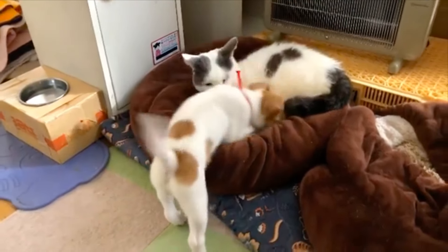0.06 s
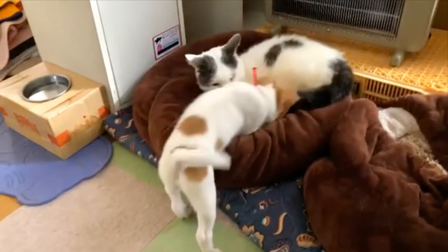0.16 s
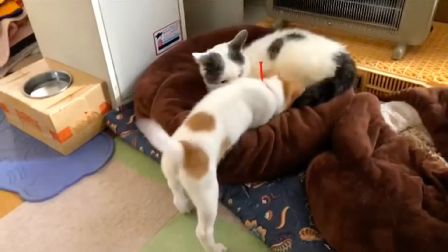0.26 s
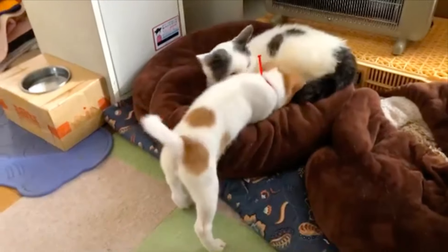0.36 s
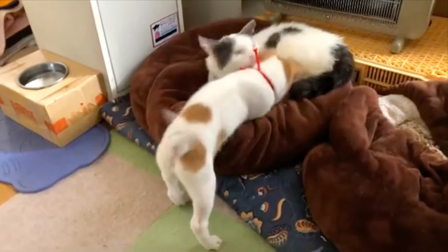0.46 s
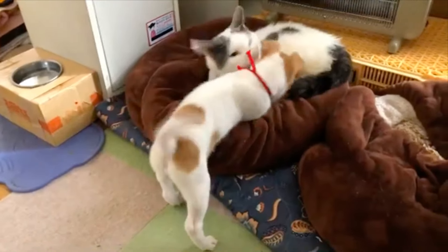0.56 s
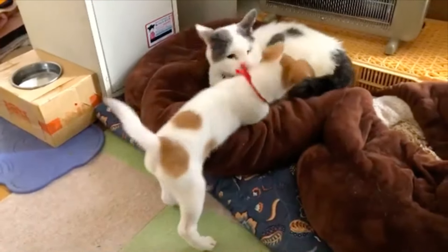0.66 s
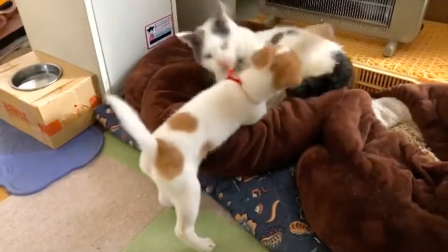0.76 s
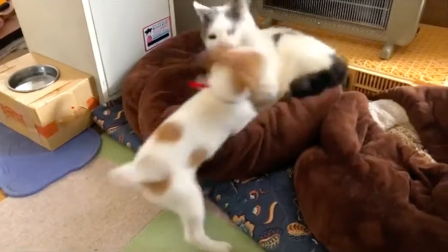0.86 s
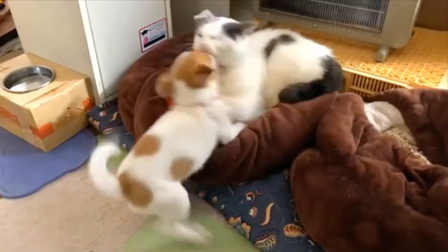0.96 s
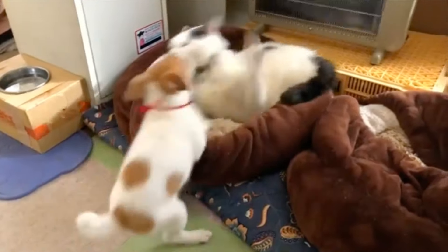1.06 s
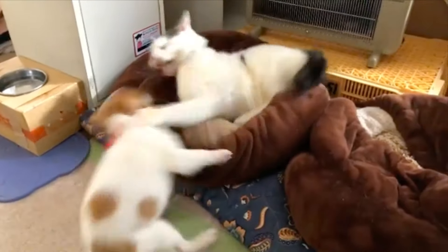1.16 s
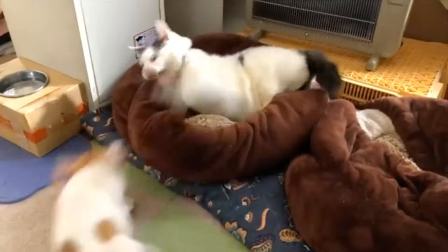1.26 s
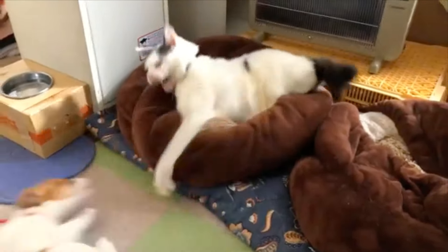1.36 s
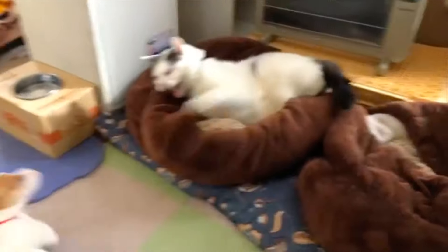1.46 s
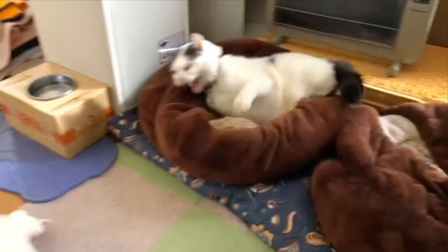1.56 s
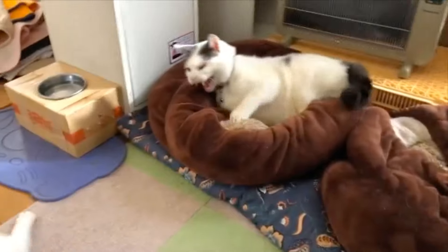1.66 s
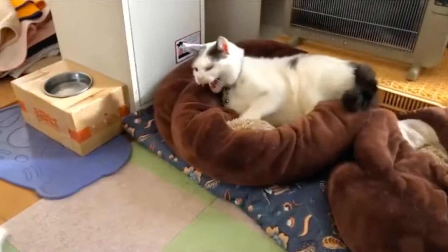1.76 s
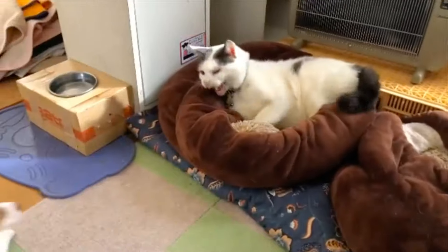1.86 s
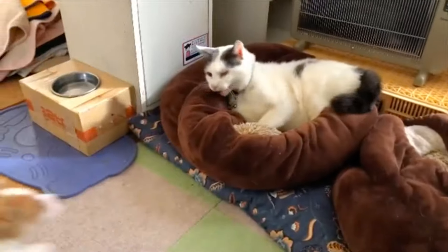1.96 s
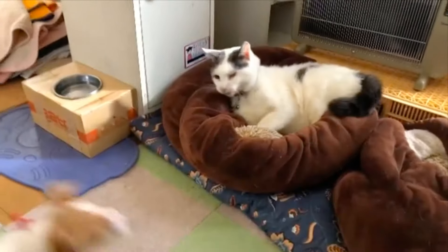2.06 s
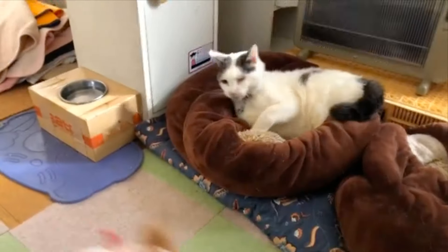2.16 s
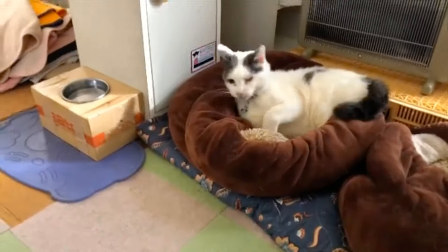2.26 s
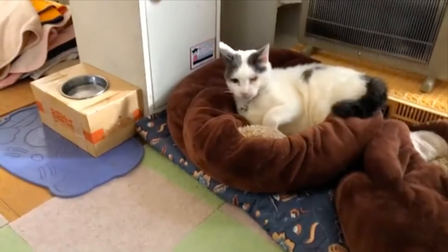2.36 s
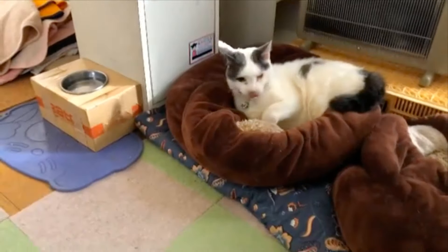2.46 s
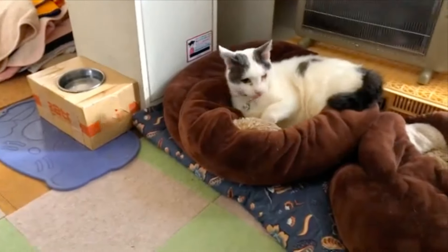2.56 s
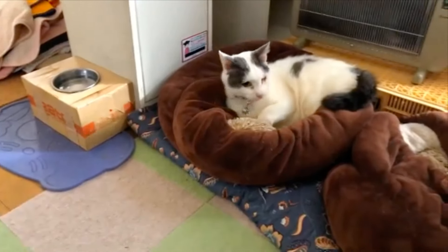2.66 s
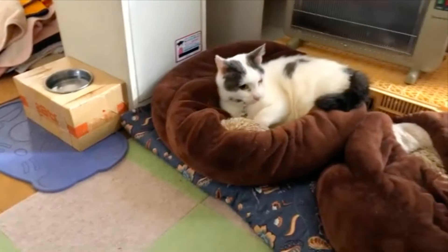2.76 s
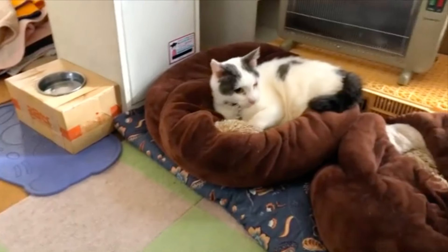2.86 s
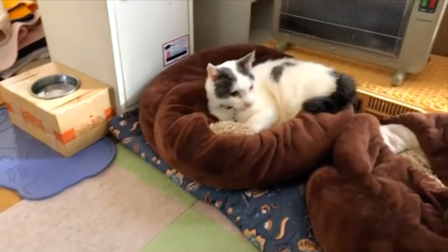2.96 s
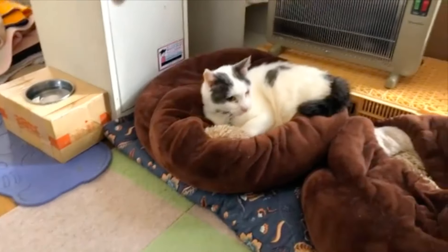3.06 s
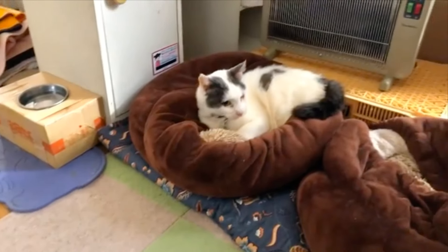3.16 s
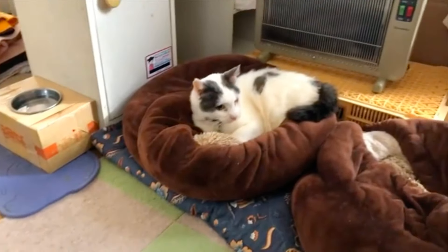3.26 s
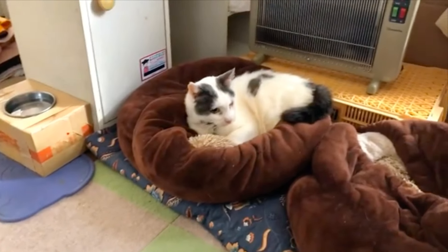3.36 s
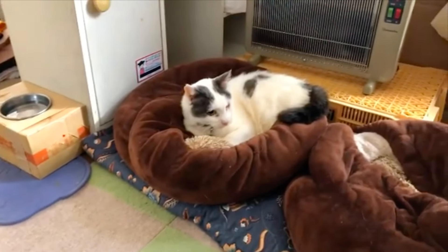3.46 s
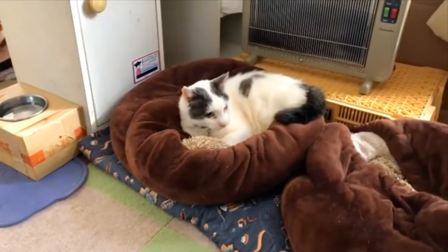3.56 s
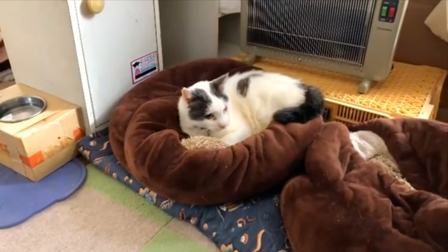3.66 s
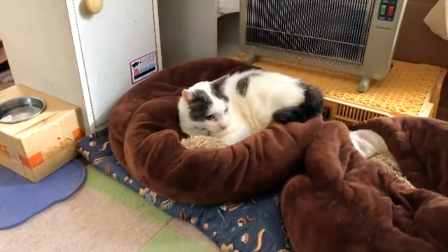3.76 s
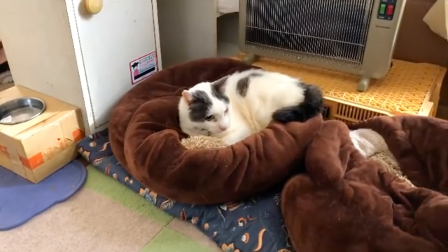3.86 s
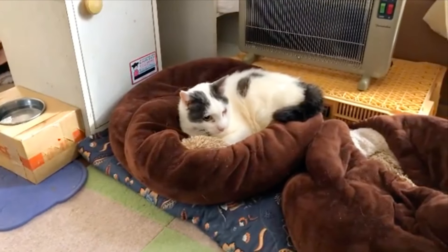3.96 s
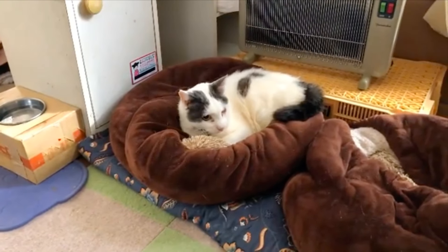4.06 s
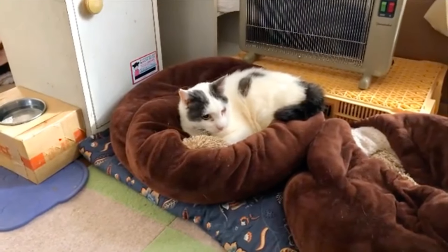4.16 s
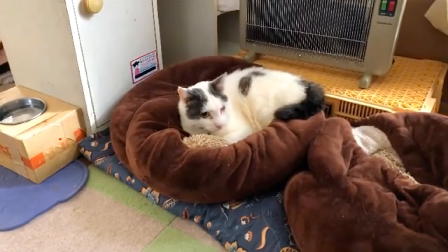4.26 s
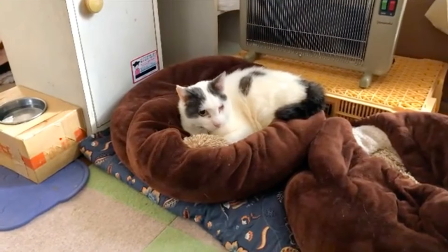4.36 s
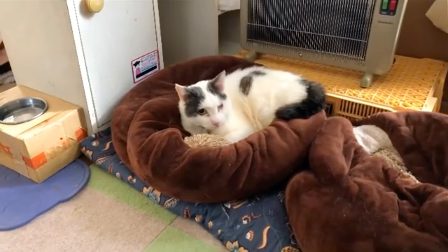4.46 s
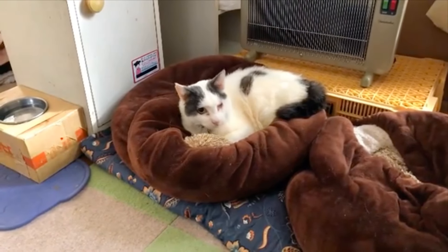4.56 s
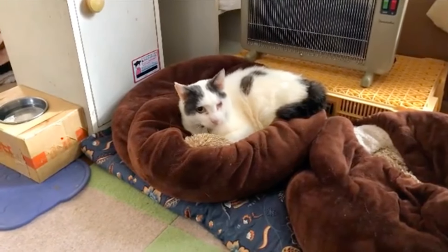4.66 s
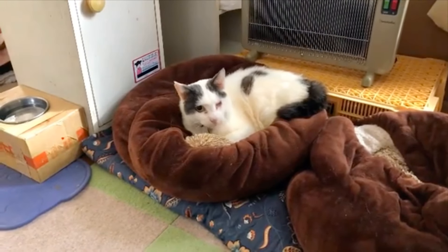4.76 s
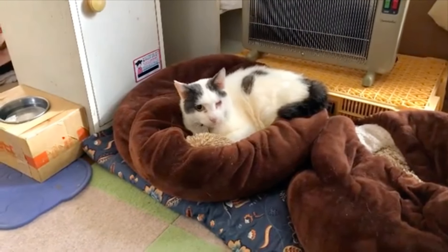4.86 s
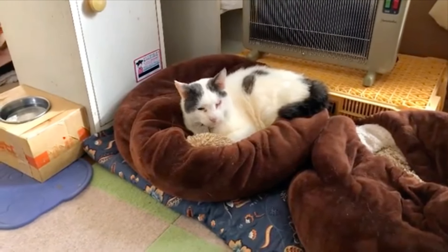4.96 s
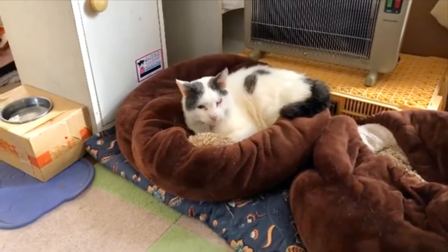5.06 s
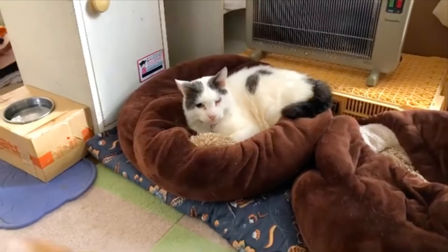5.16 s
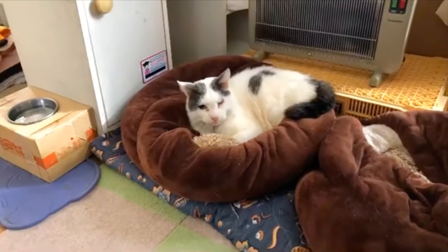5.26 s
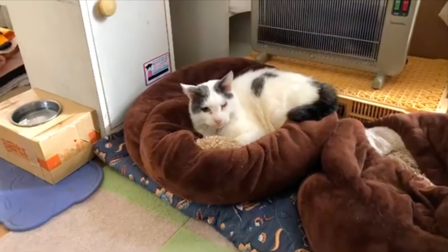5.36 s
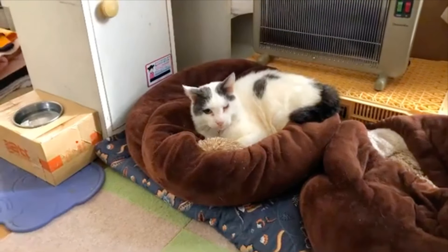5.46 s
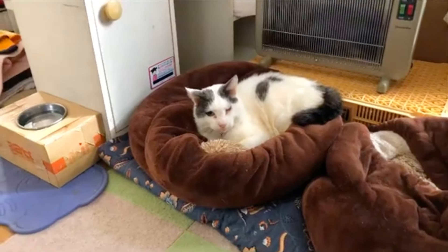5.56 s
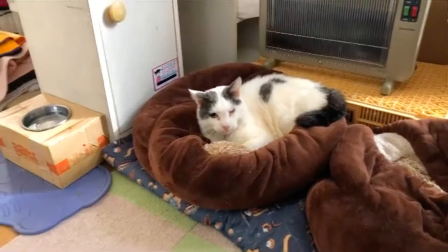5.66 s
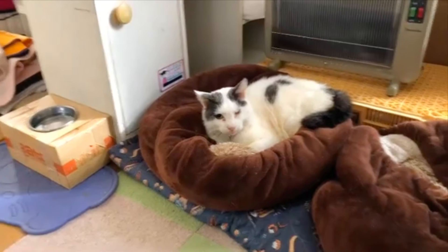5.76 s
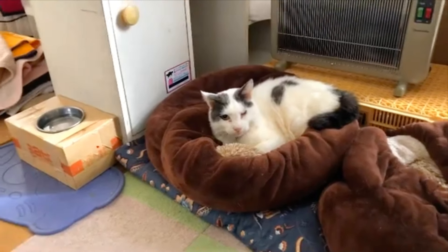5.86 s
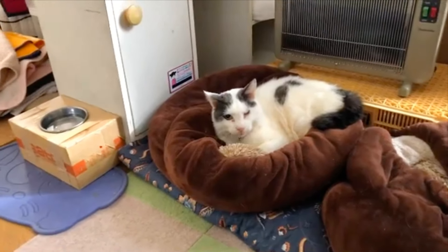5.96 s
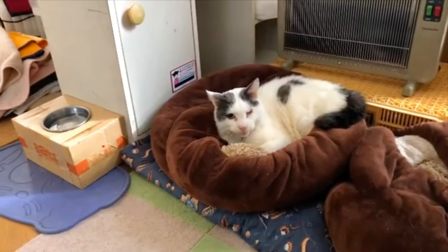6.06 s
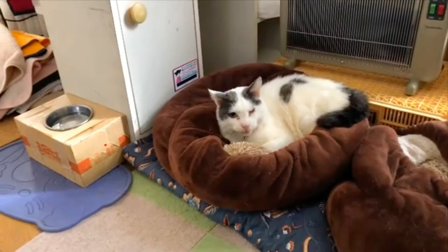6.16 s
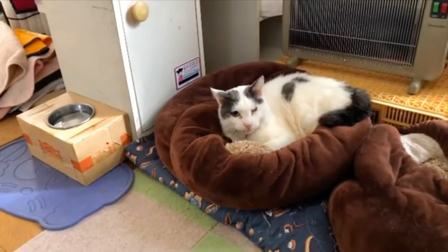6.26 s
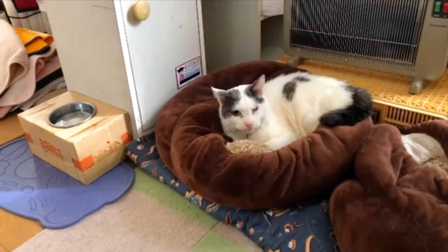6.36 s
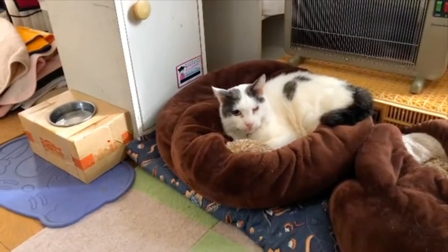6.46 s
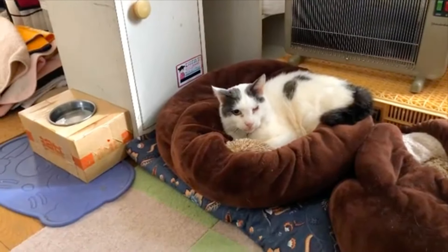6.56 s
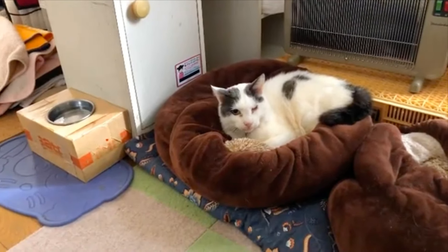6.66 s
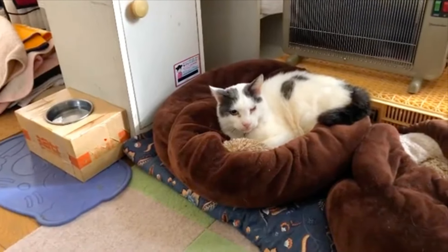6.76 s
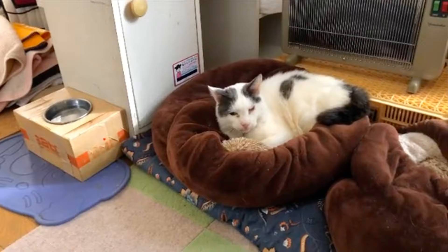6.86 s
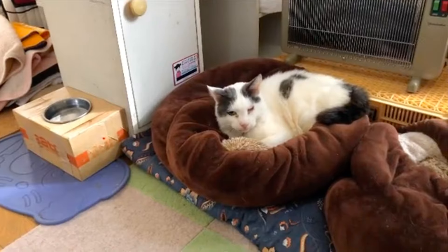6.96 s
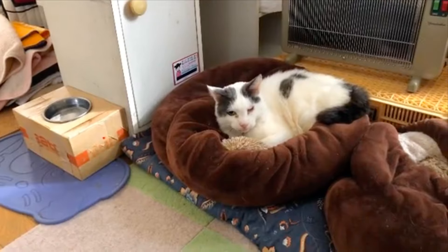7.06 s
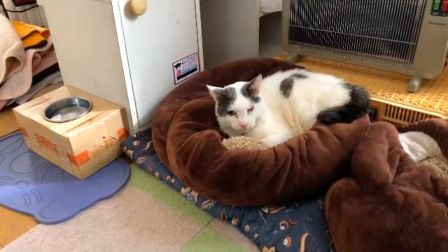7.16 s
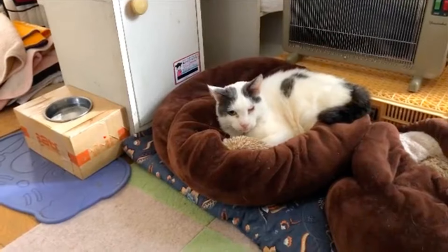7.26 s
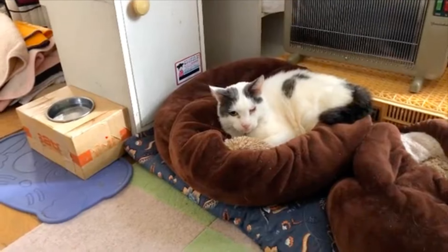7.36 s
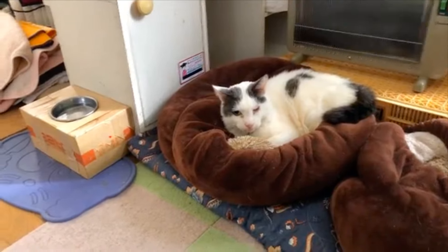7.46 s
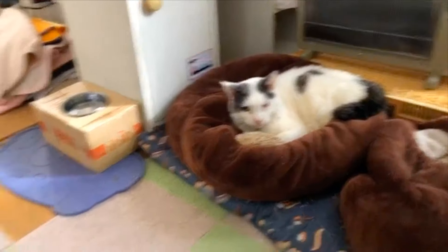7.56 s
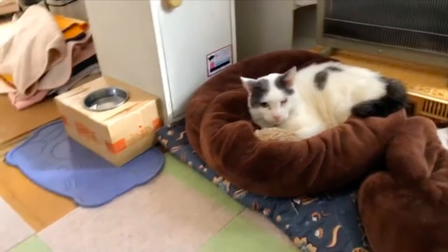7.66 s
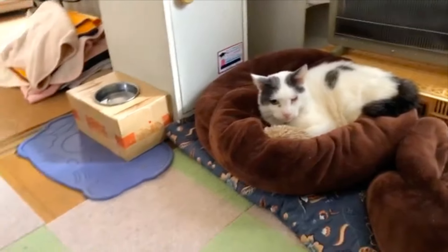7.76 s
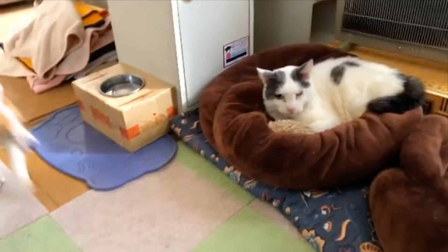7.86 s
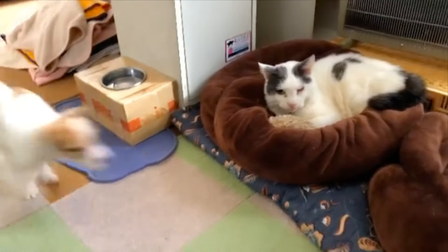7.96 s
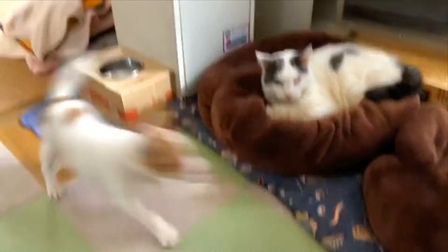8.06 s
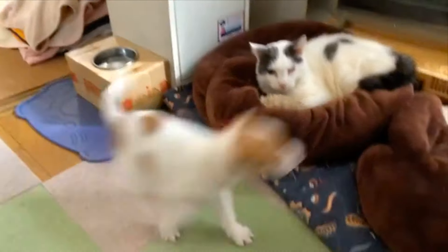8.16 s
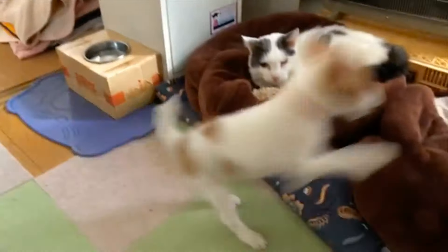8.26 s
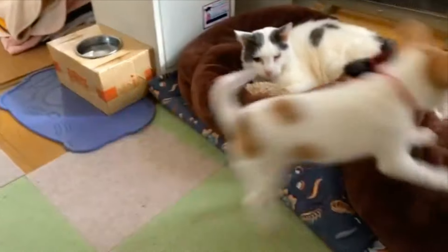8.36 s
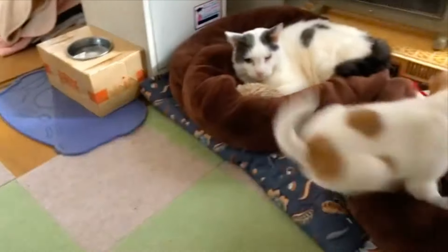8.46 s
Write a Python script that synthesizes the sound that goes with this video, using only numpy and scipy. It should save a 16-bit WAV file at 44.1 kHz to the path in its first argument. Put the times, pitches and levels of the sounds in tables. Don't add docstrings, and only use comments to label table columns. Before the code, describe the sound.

Brief rough cat cry, bell-jangling swat and a sharp fading hiss, followed by a puppy galloping away and back over boomy floorboards with clicking claws.

```python
import sys
import numpy as np
from scipy import signal
from scipy.io import wavfile
from scipy.ndimage import uniform_filter1d

SR = 44100
rng = np.random.default_rng(int(sys.argv[2]) if len(sys.argv) > 2 else 0)


def generate_wav(sig):
    pcm = np.round(np.clip(np.atleast_2d(sig).T, -1, 1) * 32767).astype(np.int16)
    wavfile.write(sys.argv[1], SR, pcm)


def boost(x):
    u = np.asarray(x, float) / 20
    return 10 ** u


N = 375732


def evened(x):
    return x / np.sqrt(np.mean(x ** 2) + 1e-20)


def read(points, hz):
    f, value = np.transpose(points)
    return np.interp(np.log(hz + 1), np.log(f + 1), value)


def add(mix, s, sound):
    part = mix[round(s * SR):][:len(sound)]
    part += sound[:len(part)]


def resonate(x, hz, width):
    turn = np.exp(2j * np.pi * np.cumsum(hz * np.ones(len(x))) / SR)
    r = np.exp(-np.pi * width / SR)
    return 2 * (turn * signal.lfilter([1 - r], [1, -r], x / turn + 1e-18)).real


def band(x, lo_hz, hi_hz):
    edges_hz = [lo_hz, min(hi_hz, .45 * SR)]
    return evened(signal.sosfilt(signal.butter(2, edges_hz, "band", fs=SR, output="sos"), x))


def columns(rows):
    s, *values = np.transpose(rows)
    t = np.arange(s[0], s[-1], 1 / SR)
    return t, [np.interp(t, s, v) for v in values]


def ring(hz, db, t60, t, phase=0):
    return boost(db - 60 * t / t60) * np.sin(2 * np.pi * hz * t + phase)


def noise(colour_db, patchy_db):
    frames, hz = N // 256 + 5, np.fft.rfftfreq(1024, 1 / SR)
    a, b, patches = rng.standard_normal((frames, 513, 3)).T
    patches = uniform_filter1d(patches, size=12, axis=0)
    patches = evened(uniform_filter1d(patches, size=10, axis=1))
    z = (a + 1j * b) * boost(colour_db(hz)[:, None] + patchy_db * patches)
    return evened(signal.istft(z, nperseg=1024, noverlap=768)[1][:N])


# (time [s], effort [dB], pitch [Hz], mouth resonance [Hz], roughness [0-1])
YOWL_CURVE = [
    (.475, -46, 591, 2360, 0.54),
    (.55, -40, 591, 2800, 0.6),
    (.562, -32.5, 628, 2180, 0.16),
    (.605, -32, 648, 2610, 0.47),
    (.634, -35, 681, 2460, 0.7),
    (.645, -29.5, 718, 2200, .45),
    (.668, -34.5, 700, 1800, 0.4),
    (.728, -33, 600, 1650, 0.5),
    (.755, -43, 500, 1533, 1),
]


def yowl():
    t, (effort_db, hz, mouth_hz, rough) = columns(YOWL_CURVE)
    rough = np.clip(rough, 0, 1)
    jitter = 1 + .26 * uniform_filter1d(rng.standard_normal(len(t)), size=120)
    turns = np.cumsum(hz * jitter) / SR
    folds = sum(np.cos(2 * np.pi * k * turns) for k in range(1, 12))
    puffs = (0.48 + np.exp(-(turns % 1) / 0.52)) * rng.standard_normal(len(t))
    drive = (1 - rough) * evened(folds) + rough * evened(puffs)
    flutter = boost(2.2 * evened(uniform_filter1d(rng.standard_normal(len(t)), size=400)))
    throat = boost(-5) * resonate(resonate(drive, hz, 270), hz, 270)
    mouth = drive
    for _ in range(3):
        mouth = resonate(mouth, mouth_hz, 1500)
    breath = resonate(resonate(drive + .8 * puffs, 5700, 900), 5700, 900)
    voice = throat - mouth + boost(-23) * flutter * breath
    return t[0], boost(effort_db - 0.5) * flutter * evened(voice) * signal.windows.tukey(len(t), .1)


# (frequency [Hz], level per Hz [dB])
HISS_SPECTRUM = [(120, -28), (230, -2.5), (500, -9), (922, -8.5), (1520, -11), (1950, -13.5), (3630, -14),
                 (14000, -20.5)]
# (frequency [Hz], width [Hz], gain [dB])
MOUTH_RESONANCES = [(960, 360, 5.5), (1320, 350, 5), (2800, 590, 3), (3620, 180, 2), (4500, 1400, 7),
                    (11400, 6200, 10.5)]
# (frequency [Hz], width [Hz], level [dB])
JAW_RESONANCES = [(1000, 100, -12), (1500, 100, -15.5), (2835, 130, -15), (3650, 200, -15),
                  (5190, 300, -15)]


def hiss():
    start_s, attack_s, hold_s, release_s = 1.3, 0.063, 0.57, 0.12
    level_db, edge_db, sag_db_per_s = -21.5, -15.5, 6.5
    spit_db, spit_s = 3.5, 0.039
    teeth_db, teeth_sag_db_per_s = -0.5, 14
    jaws_shut, jaws_open_s, jaws_wander = 0.89, 0.025, 0.044
    t = np.arange(0, attack_s + hold_s + release_s, 1 / SR)
    edges = np.maximum(1 - t / attack_s, 0) + np.maximum(1 - (t[-1] - t) / release_s, 0)
    spit = spit_db * np.exp(-(t / spit_s / 2) ** 4)
    flow_db = level_db - sag_db_per_s * t + edge_db * edges + spit

    def mouth(hz):
        return sum(db / (1 + (2 * (hz - f) / w) ** 2) for f, w, db in MOUTH_RESONANCES)

    ripples_db = 1.6 * evened(uniform_filter1d(rng.standard_normal(513), size=3))
    air = noise(lambda hz: read(HISS_SPECTRUM, hz) + mouth(hz) + ripples_db, 2.2)[:len(t)]
    z = rng.standard_normal((2, len(t)))
    jaws = 1 - (1 - jaws_shut) * np.exp(-t / jaws_open_s) + jaws_wander * band(z[0], 2.9, 14)
    air = air + sum(boost(db) * evened(resonate(z[1], f * jaws, w)) for f, w, db in JAW_RESONANCES)
    fizz = signal.sosfilt(signal.butter(1, 3000, "high", fs=SR, output="sos"), air)
    rasp = boost(1.5 * band(rng.standard_normal(len(t)), 18, 250))
    fizz_db = teeth_db - teeth_sag_db_per_s * t + 4 - 12 * np.exp(-t / 0.027)
    air += (boost(fizz_db) - 1) * fizz
    return start_s, boost(flow_db) * rasp * air * signal.windows.tukey(len(t), .05)


# (time [s], peak level [dB])
BELL_STROKES = [(0.9269, -21), (.934, -24), (0.941, -28), (.955, -41), (0.9888, -31), (1.03, -42.5),
                (1.137, -38), (1.158, -26), (1.206, -29), (1.26, -30), (1.292, -35), (1.06, -19.5),
                (1.0846, -23.5), (1.112, -28), (1.122, -24), (1.1516, -28), (1.184, -24), (1.2005, -14),
                (1.216, -24), (1.233, -28), (1.349, -28), (1.4, -26), (1.505, -24), (1.533, -25),
                (1.6679, -27), (2.8294, -44)]
# (frequency [Hz], level [dB], t60 [s])
BELL_MODES = [(9660, -15, 0.07), (9600, 5, 0.024), (10500, -18, 0.022)]


def bell():
    out, t = np.zeros(N), np.arange(5000) / SR
    chatter = boost(1900 * np.minimum(t, .005))
    phases = rng.uniform(0, 2 * np.pi, (len(BELL_STROKES), len(BELL_MODES)))
    for (s, db), phase in zip(BELL_STROKES, phases):
        shell = sum(ring(*mode, t, p) for mode, p in zip(BELL_MODES, phase))
        add(out, s, boost(db + 0.5) * shell * chatter * np.minimum(t / 0.0019, 1))
    return out


# (time [s], long-joist boom [dB], short-span boom [dB], plank knock [dB])
FLEEING_FALLS = [(1.001, -22.5, -48.5, -35.5), (1.08, -50, -39, -30.5), (1.175, -23, -30.5, -38),
                 (1.257, -42, -41, -29), (1.338, -10.5, -17, -51), (1.365, -3, -37, -28),
                 (1.433, 0, -7.5, -41), (1.462, -6.5, -15, -45), (1.498, -6, -40, -47),
                 (1.654, -12, -28, -30), (1.824, -11, -17.5, -33), (1.948, -22.5, -44, -50),
                 (2.128, -15, -21, -35), (2.218, -17.5, -25.5, -41), (2.29, -8, -22, -28),
                 (2.36, -20, -21, -46)]
# (time [s], joist [dB], span [dB], knock [dB])
AWAY_FALLS = [(2.538, -25, -23.5, -43), (2.68, -39, -31, -29.5), (2.839, -28, -22, -30.5),
              (2.971, -38, -24.5, -30.5), (3.112, -43, -19, -30.5), (3.186, -23, -20, -29),
              (3.253, -28, -19.5, -27.5), (3.394, -33, -27, -30.5), (3.541, -24, -19.5, -31.5),
              (3.616, -19, -21, -30), (3.77, -37, -27, -28), (3.971, -25, -49, -40),
              (4.022, -33, -20.5, -30), (4.445, -43, -31, -32), (4.504, -40, -31, -32),
              (4.69, -38, -31, -40), (4.742, -32, -25, -37), (5.13, -42, -40, -32), (5.75, -45, -36, -33)]
# (time [s], joist [dB], span [dB], knock [dB])
ROMPING_FALLS = [ (4.14, -35, -11, -24.5), (4.173, -14, -11.5, -14), (4.253, -14, -12.5, -20.5),
                 (4.388, -43, -21.5, -25), (4.56, -34, -16.5, -25), (4.61, -40, -17, -35),
                 (4.789, -17, -13, -58), (4.815, -16, -10, -20), (4.865, -33, -13, -23.5),
                 (4.963, -12, -6, -15), (5.205, -35, -5, -13.5), (5.227, 0.5, -3.5, -8),
                 (5.277, 4, -11.5, -16.5), (5.434, 1, -13, -24), (5.5505, 4.5, -9, -14.5)]
# (time [s], joist [dB], span [dB], knock [dB])
RETURNING_FALLS = [ (5.839, -21, -18, -28), (5.874, -8.5, -34, -26), (5.986, -13.5, -45, -31.5),
                   (6.1, -18, -31, -47), (6.152, -11, -18.5, -30.5), (6.172, -26, -39, -43),
                   (6.25, -30, -19, -24), (6.344, -19.5, -28, -24), (6.535, -51, -27.5, -56),
                   (7.427, -19, -21, -31), (7.53, -44, -24.5, -33), (7.572, -22, -21, -33),
                   (7.644, -10.5, -21, -32), (7.686, -10, -40, -41), (7.791, -10.5, -24, -37),
                   (7.826, -11, -35, -46), (7.969, -37.5, -18, -27.5), (8.012, -13, -18, -33.5),
                   (8.091, -13, -14, -30.5), (8.144, -34, -12.5, -39), (8.192, -8.5, -11, -19),
                   (8.243, -6.5, -37, -21), (8.328, -17, -20.5, -26.5), (8.371, -10.5, -17.5, -21.5)]
# (frequency [Hz], level [dB], t60 [s])
PLANK_MODES = [(216.8, -4.5, 0.16), (242.3, 6.5, 0.058), (307.6, -4, 0.11), (376.2, -3.5, 0.086),
               (460, -10.5, 0.09), (549, -10, 0.057), (706, -5, 0.026)]


def paws():
    boom, knocks, t = np.zeros(N), np.zeros(N), np.arange(SR // 3) / SR
    falls = FLEEING_FALLS + AWAY_FALLS + ROMPING_FALLS + RETURNING_FALLS
    chances = rng.random((len(falls), 2 + 2 * len(PLANK_MODES)))
    for (s, joist_db, span_db, knock_db), u in zip(falls, chances):
        joist = ring(103 + 2 * u[0], joist_db, .3, t)
        span = ring(129 + 9 * u[1], span_db + 9, 0.13, t)
        span = span + ring(178.5, span_db - 6.5, 0.35, t)
        spot = u[2:].reshape(-1, 2)
        knock = sum(ring(f * (.9 + 0.223 * a), d + 3 + 5 * b, t60, t)
                    for (f, d, t60), (a, b) in zip(PLANK_MODES, spot))
        add(boom, s, (joist + span) * (1 - np.exp(-t / 0.0075)))
        add(knocks, s, boost(knock_db) * knock * (1 - np.exp(-t / 0.0039)))
    return boom, knocks


# (time [s], level [dB], frequency [Hz], t60 [s])
PLANK_KNOCKS = [(1.58, -25.5, 228, 0.31), (3.775, -15.5, 256, .1), (4.033, -25, 323, 0.11),
                (4.277, -26, 176, 0.14), (4.316, -21, 191, 0.072), (4.398, -17, 240, 0.054),
                (4.57, -8.5, 234, 0.12), (4.974, -11, 290, 0.14), (5.545, -8.5, 389, 0.09),
                (5.846, -16.5, 190, .12), (6.209, -25.5, 642, 0.094), (7.968, -15, 488, 0.041),
                (4.826, -11, 257, 0.11), (4.875, -18, 248, 0.097), (4.962, -16, 306, .07),
                (5.205, -13, 320, 0.087), (5.223, -7, 600, .06), (5.448, -24, 750, .04),
                (5.552, -2, 118, .13), (5.5555, -17, 560, .04), (5.565, -17, 300, .2),
                (5.508, -27, 800, .05), (5.275, -13, 280, .15), (4.64, -24, 280, .15),
                (6.155, -23, 200, .08), (7.43, -24, 200, .12), (4.178, -22, 597, 0.053),
                (8.244, -22, 483, .06)]


def knocks_square():
    out, t = np.zeros(N), np.arange(SR // 4) / SR
    for s, db, hz, t60 in PLANK_KNOCKS:
        add(out, s, ring(hz, db, t60, t) * (1 - np.exp(-t / 0.0012)))
    return out


# (time [s], peak level [dB], tick pitch [Hz])
CUSHION_CLAWS = [(0.825, -20, 2200), (0.9253, -8, 9300), (1.0601, -9, 8700), (1.0861, -11.5, 2500),
                 (1.085, -14, 6500), (0.96, -19, 6000), (1.1, -13, 4400), (1.1827, -11, 9800),
                 (2.2926, -21.5, 3900), (4.346, -36, 5700), (4.385, -25.5, 2000), (4.177, -17.5, 2100),
                 (4.556, -35, 2300), (4.639, -31, 2700), (4.9353, -22.5, 2400), (5.29, -19, 1500),
                 (5.5095, -17.5, 1940)]
# (time [s], peak level [dB], tick pitch [Hz])
SWAT_CLAWS = [
    (1.1528, -21, 3460),
    (1.1628, -24, 3270),
    (1.174, -19, 4000),
    (1.2054, -12, 5570),
    (1.2111, -12, 5970),
    (1.2111, -14, 5630),
    (1.2177, -9, 5570),
    (1.2235, -12, 8500),
    (1.244, -14, 7000),
    (1.259, -16, 4960),
]
# (time [s], peak level [dB], tick pitch [Hz])
FLOOR_CLAWS = [(5.8023, -4, 9000), (5.902, -12, 4400), (5.9678, -13, 4280), (5.9939, -18.5, 3170),
               (6.0453, -19, 3580), (6.0638, -10, 4680), (6.1504, -15.5, 4700), (6.2078, -16.5, 2610),
               (6.2084, -17.5, 5600), (5.996, -33, 7800), (6.2289, -15.5, 5000), (6.249, -20.5, 3630),
               (6.3412, -18.5, 4700), (7.422, -18, 3280), (7.446, -17, 4100), (7.5176, -15.5, 3530),
               (7.5532, -19, 3140), (7.5679, -8, 3200), (7.5751, -8.5, 5100), (7.6353, -21, 3370),
               (7.805, -24, 3500), (6.334, -25, 4000), (8.1824, -21, 6570), (7.67, -16.5, 3080),
               (7.728, -17, 3960), (7.772, -20.5, 4000), (8.087, -29, 4500), (8.11, -26.5, 4360),
               (8.1095, -24, 9500), (7.637, -26, 9000), (7.67, -25, 9000), (8.193, -14, 9200)]
# (time [s], peak level [dB], tick pitch [Hz], echo t60 [s])
DISTANT_CLAWS = [(2.082, -32, 1200, .05), (2.128, -38, 1300, 0.19), (2.195, -38, 1100, 0.13),
                 (2.41, -40, 3200, .12), (2.4536, -38, 1500, 0.088), (2.472, -27.5, 1400, 0.097),
                 (2.548, -27, 2010, 0.15), (2.65, -34.5, 3300, 0.26), (2.682, -29, 1500, 0.073),
                 (2.743, -25.5, 2120, 0.096), (2.84, -40, 2230, 0.17), (2.9389, -24.5, 2310, 0.15),
                 (3.037, -36.5, 1820, 0.13), (3.06, -24, 780, .12), (3.128, -19.5, 2130, 0.14),
                 (3.226, -30, 1500, 0.27), (3.315, -19, 2640, 0.11), (3.375, -45, 1800, .12),
                 (3.405, -30, 1500, 0.16), (3.437, -21, 890, 0.17), (3.491, -24, 2700, 0.25),
                 (3.5777, -30, 1700, .15), (3.61, -21, 925, 0.099), (3.6634, -24.5, 2080, 0.1),
                 (3.745, -23.5, 1830, 0.17), (3.833, -29, 2050, .08), (3.853, -27.5, 2800, 0.18),
                 (3.92, -31.5, 1910, .2), (4.052, -35.5, 1300, 0.22), (4.245, -35, 2680, 0.09),
                 (4.307, -28, 1170, 0.17), (4.2, -33, 1500, .15), (4.814, -33, 1900, 0.1),
                 (4.73, -29.5, 1000, 0.17), (5.035, -34, 1000, 0.19), (5.124, -29, 1370, .1),
                 (5.43, -29, 1300, .08), (5.448, -28, 900, .08)]
# (time [s], peak level [dB])
PAD_SLAPS = [(.826, -17.5), (.9127, -22.5), (1.088, -14), (1.264, -13), (4.1773, -28), (4.8135, -25),
             (4.9355, -27), (5.181, -30), (5.225, -24), (5.29, -17), (5.5086, -25), (6.1504, -33),
             (6.2078, -36), (7.447, -34), (7.5677, -28), (7.969, -34), (8.195, -24.5)]


def claws():
    out, t = np.zeros(N), np.arange(5000) / SR
    onset = np.minimum(t / 0.000059, 1)
    near = CUSHION_CLAWS + SWAT_CLAWS + FLOOR_CLAWS
    ticks = [(s, db, hz, 0.038, 0.55) for s, db, hz in near]
    ticks += [(*row, 1.5) for row in DISTANT_CLAWS]
    for (s, db, hz, smear, spread), z in zip(ticks, rng.standard_normal((len(ticks), len(t)))):
        wide = band(z, hz / 2.65, hz * 1.58)
        narrow = band(band(z, hz / 1.32, hz * 1.26), hz / 1.32, hz * 1.26)
        crack = boost(6.5 - 60 * t / 0.0023) * wide
        burst = boost(-2.5 - 60 * t / smear) * (narrow + spread * wide)
        rustle = boost(-23.5 - 60 * t / 0.33) * wide
        add(out, s, boost(db - 10) * (crack + burst + rustle) * onset)
    taps = PAD_SLAPS + [(s, -36) for s, *_ in DISTANT_CLAWS]
    for (s, db), z in zip(taps, rng.standard_normal((len(taps), len(t)))):
        dull = band(band(z, 450, 1800), 450, 1800)
        add(out, s, boost(db + 1.5 - 60 * t / .025) * dull * onset)
    return out


# (loudest moment [s], dying time [s], level [dB], tilt to bright [dB])
DRAGS = [(.39, .04, -49.5, 4), (0.842, 0.11, -35, 2.5), (.92, 0.15, -37.5, 8), (1.081, 0.066, -31, 4),
         (1.219, 0.18, -26.5, 1.5), (2.05, 0.46, -50.5, -1), (2.206, 0.062, -37.5, -1),
         (2.3, 0.063, -43, -5), (2.48, 0.17, -42.5, -4.5), (2.76, 1, -46, -3.5), (3.12, 0.47, -48.5, -7.5),
         (3.34, 0.63, -40, -5), (3.6, 0.91, -44, -9.5), (3.86, 0.1, -43.5, -4), (4.12, 0.16, -40.5, -6),
         (4.928, 0.11, -40, -5.5), (5.06, 0.093, -40, 0), (5.339, 0.04, -33, 4), (5.529, 0.095, -36.5, -4),
         (5.823, 0.046, -33.5, -1), (5.9, 0.1, -33, 2), (6.23, 0.34, -44.5, -1), (6.36, 0.053, -44.5, -6),
         (6.5, 1, -51, -4.5), (6.72, 0.039, -46, -2), (7.441, 0.034, -36.5, 2.5), (7.7, 0.58, -46.5, 3),
         (8.1, 0.024, -42, 4), (8.259, 0.15, -41, -4), (8.398, 0.045, -47, -9.5), (4.08, 0.061, -47, -7),
         (4.66, 0.28, -53.5, -10.5), (5.3, 0.089, -33.5, -2.5), (6.09, 0.12, -51, 4),
         (6.27, 0.1, -40.5, -2), (7.6, 0.19, -44, 0), (7.47, 0.054, -39, 0)]


def scuffs():
    swell_share, swell_max_s, dying_db, rounding = 0.79, 0.11, 28, 1.295
    fizz_db, fizz_tilt, rub_db, rub_tilt = -5.5, 1, -4, 1.52
    cloth = noise(np.zeros_like, 3.5)
    grains = boost(3.6 * np.minimum(rng.exponential(1, N), 5)) * rng.standard_normal(N)
    grains = 0.56 * evened(grains) + cloth
    grains *= boost(2.6 * band(rng.standard_normal(N), 10, 60))
    paw_drags = [(s + 0.0078, 0.091, knock_db - 36.5, -10.5) for s, *_, knock_db in ROMPING_FALLS]
    t, level = np.arange(0, N, 64) / SR, 0
    for s, dying, db, tilt_db in DRAGS + paw_drags:
        swell = min(swell_share * dying, swell_max_s)
        away = np.maximum((s - t) / swell, (t - s) / dying)
        colour_db = np.array([[0], [fizz_db + fizz_tilt * tilt_db], [rub_db - rub_tilt * tilt_db]])
        level = level + boost(db - dying_db * away ** rounding + colour_db) ** 2
    sizes = band(grains, 653, 4140), band(grains, 2300, 11500), band(grains, 230, 1370)
    every = np.arange(N) / SR
    return sum(np.interp(every, t, np.sqrt(power)) * size for power, size in zip(level, sizes))


# (time [s], length [s], level [dB], centre [Hz], half-width [frequency ratio])
RUSHES = [(1.4, 0.064, -25, 7100, 2), (1.34, 0.064, -26.5, 4200, 1.4), (1.341, 0.025, -22.5, 943, 1.01),
          (2.638, 0.094, -47.5, 7960, 2.9), (4.325, 0.045, -46.5, 2500, 1.04), (7.7, .06, -42, 2460, 1.1),
          (7.66, .24, -47, 4600, 1.4), (5.797, .04, -25.5, 8800, 1.2), (8.165, .05, -42, 10000, 1.5),
          (7.83, 0.093, -50, 1970, 1.1), (5.51, 0.027, -41.5, 4200, 1.07), (5.116, 0.091, -49.5, 5400, 2.5),
          (5.276, 0.047, -38.5, 5960, 1.5), (5.742, 0.022, -52, 4300, 1.5), (6.977, 0.089, -52, 1200, 2.2),
          (8.178, 0.022, -29, 6400, 1.9), (4.81, 0.055, -37, 1190, 1.15), (5.04, .05, -43, 830, 1.3),
          (5.29, 0.037, -35, 1270, 1.4), (5.86, .04, -33, 1100, 1.7), (6.468, 0.032, -41, 2100, 1.5),
          (8.2, .015, -45, 4500, 1.5), (8.384, 0.021, -45, 4500, 2.6)]


def swipes():
    out = np.zeros(N)
    for s, length, db, hz, ratio in RUSHES:
        n = round(length * SR)
        rush = band(rng.standard_normal(n), hz / ratio, hz * ratio)
        add(out, s, boost(db) * rush * signal.windows.tukey(n, .6))
    return out


# (time [s], length [s], level [dB], start pitch [Hz], end pitch [Hz])
PAD_SQUEAKS = [
    (8.1, 0.049, -46, 1770, 1950),
    (8.228, 0.071, -37.5, 1440, 1830),
    (8.245, 0.067, -44.5, 2000, 2500),
    (8.235, .06, -46, 3600, 4000),
    (8.35, .03, -47, 2260, 2300),
    (7.4, .04, -48, 2700, 2600),
]


def squeaks():
    out, width_hz = np.zeros(N), 380
    for s, length, db, start_hz, end_hz in PAD_SQUEAKS:
        n = round(length * SR)
        hz = np.linspace(start_hz, end_hz, n)
        rub = resonate(resonate(rng.standard_normal(n), hz, width_hz), hz, width_hz)
        add(out, s, boost(db) * evened(rub) * signal.windows.tukey(n, .6))
    return out


# (time [s], level [dB])
BOARD_SHAKE = [
    (.9, -38),
    (1.4, -35.5),
    (2.4, -36),
    (4.2, -31.5),
    (5.3, -33),
    (6.4, -34.5),
    (6.7, -66),
    (7.4, -57.5),
    (7.5, -36),
    (8.52, -43),
]


def rumble():
    t, (db,) = columns(BOARD_SHAKE)
    z = rng.standard_normal(len(t))
    return t[0], boost(db) * evened(resonate(z, 105.4, 23.0) + 0.33 * resonate(z, 121, 24.5))


# (frequency [Hz], t60 [s])
ROOM_DECAY = [(100, 0.38), (500, 0.15), (2000, 0.2), (6000, 0.27), (14000, 0.071)]


def room(x):
    taps = np.zeros(SR // 2)
    at = np.arange(200, len(taps) - 20, 20)
    taps[at + rng.integers(0, 20, len(at))] = rng.choice([-1., 1.], len(at))
    hz, t, z = signal.stft(taps, SR, nperseg=256)
    decay = boost(-60 * t / read(ROOM_DECAY, hz)[:, None])
    tail = signal.istft(z * decay, SR, nperseg=256)[1]
    return signal.fftconvolve(x, tail / np.linalg.norm(tail))[:N]


# (frequency [Hz], level per Hz [dB])
AIR_SPECTRUM = [(25, -29), (54, -12), (90, -1), (205, -3), (735, -20), (1320, -20.5), (2310, -29.5),
                (13400, -40)]
# (frequency [Hz], level [dB])
HUM_LINES = [(64.6, -47.5), (134.6, -52.5), (199.2, -52), (1297, -63), (1523, -65)]


def room_tone():
    hum = sum(boost(db) * evened(resonate(rng.standard_normal(N), hz, 6.2)) for hz, db in HUM_LINES)
    return boost(-42) * noise(lambda hz: read(AIR_SPECTRUM, hz), 1.95) + hum


def scene():
    cat = bell()
    add(cat, *yowl())
    add(cat, *hiss())
    boom, knocks = paws()
    knocks = knocks + knocks_square()
    add(boom, *rumble())
    feet = claws() + scuffs() + swipes() + squeaks()
    echoes = room(boost(-13.0) * cat + boost(-11.5) * feet + boost(-8.5) * knocks)
    return (cat + feet + boom + knocks + echoes + room_tone())[None]


def top_cut(x):
    return signal.sosfilt(signal.butter(12, 15180, fs=SR, output="sos"), x)


def record(dry):
    x = signal.sosfilt(signal.butter(3, 60, "high", fs=SR, output="sos"), dry)
    power_db = 10 * np.log10(abs(uniform_filter1d(x[0] ** 2, size=900)) + 1e-12)
    fall = np.arange(N) * 30. / SR
    held_db = np.maximum.accumulate(power_db + fall) - fall
    over_db = uniform_filter1d(np.maximum(held_db + 14.5, 0), size=2000)
    treble = signal.sosfiltfilt(signal.butter(1, 1800, "high", fs=SR, output="sos"), x)
    x = (x - treble + treble / boost(0.28 * over_db)) / boost(0.16 * over_db)
    x = x / (1 + abs(x) ** 6) ** (1 / 6)
    band_limit = signal.firwin(511, 14050, window=("kaiser", 9), fs=SR)
    x = signal.oaconvolve(x, band_limit[None], "same")
    return top_cut(x)


dry = scene()
out = record(dry)
generate_wav(out)
```